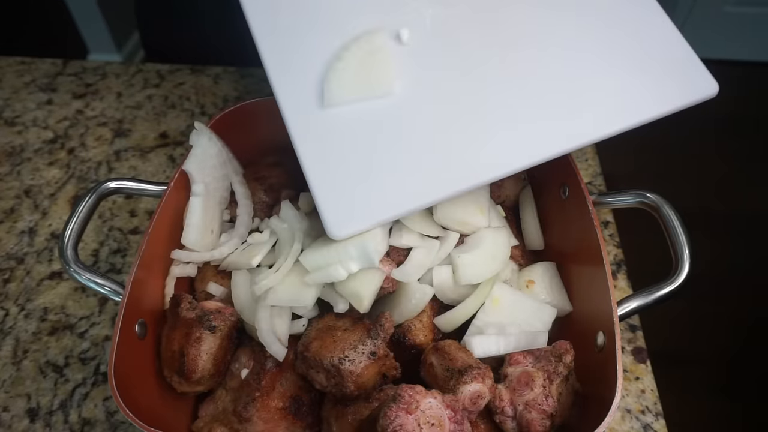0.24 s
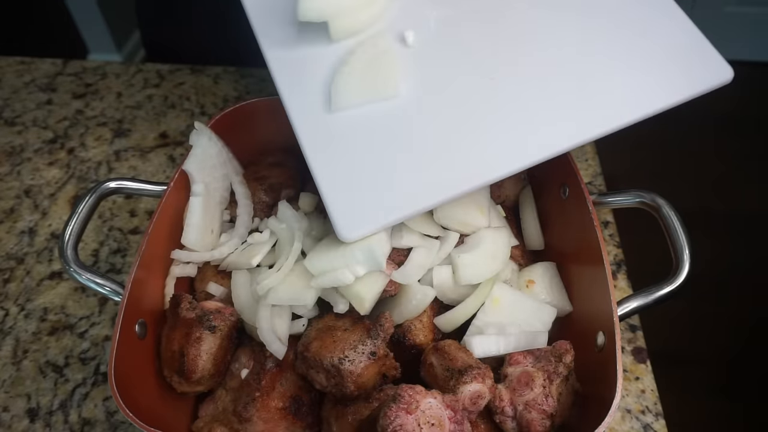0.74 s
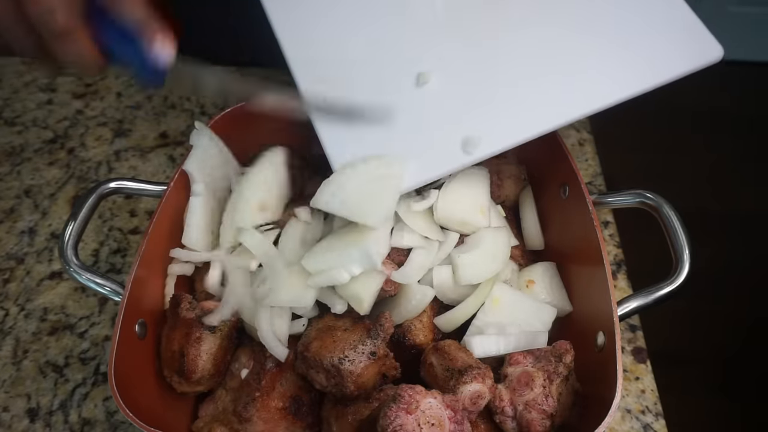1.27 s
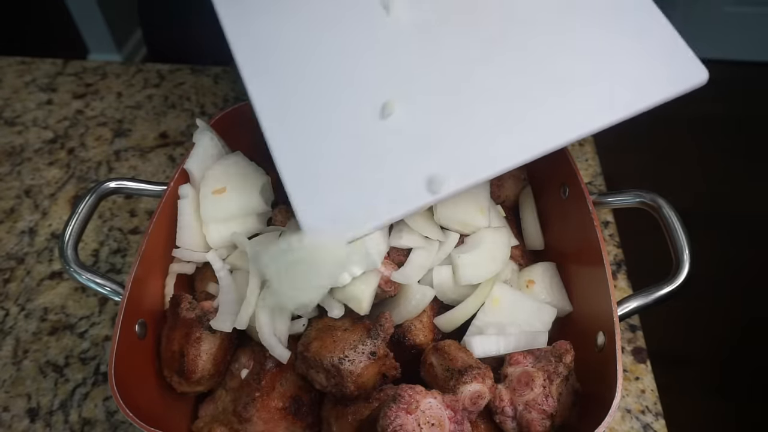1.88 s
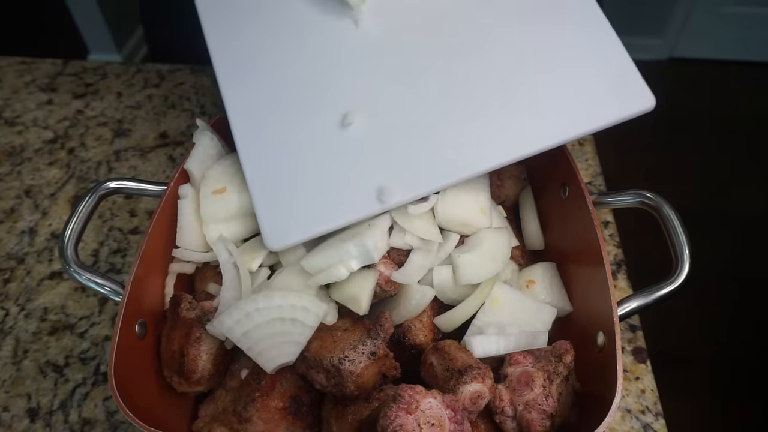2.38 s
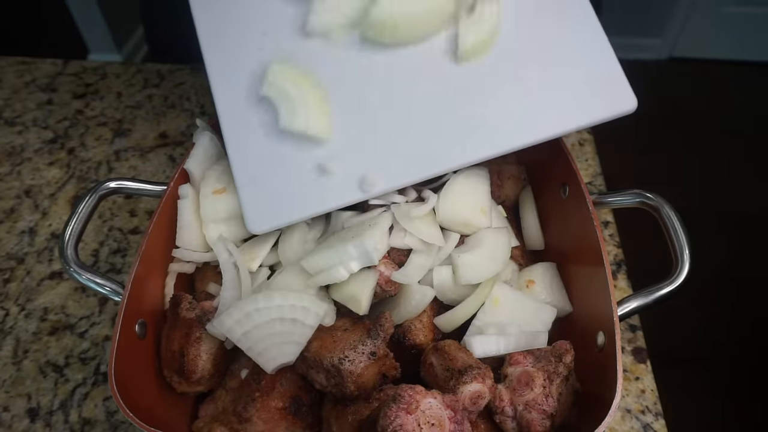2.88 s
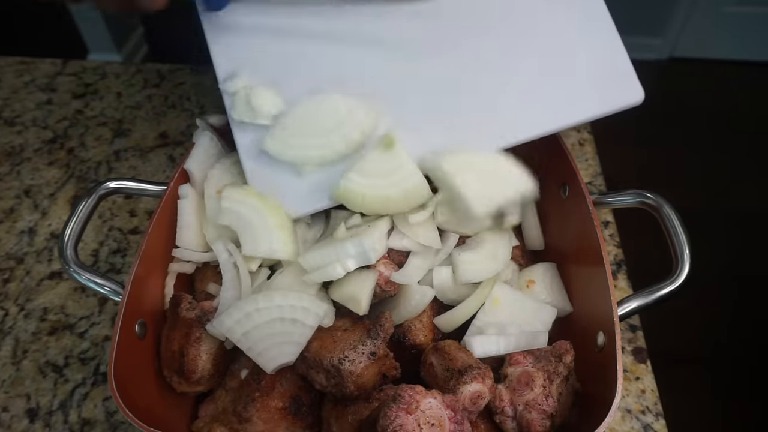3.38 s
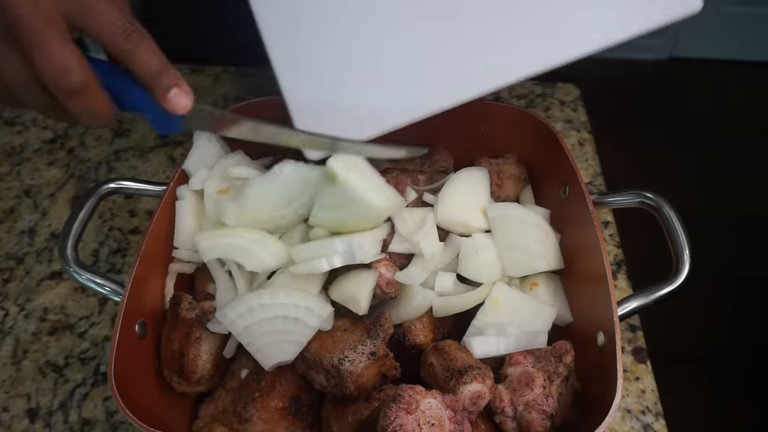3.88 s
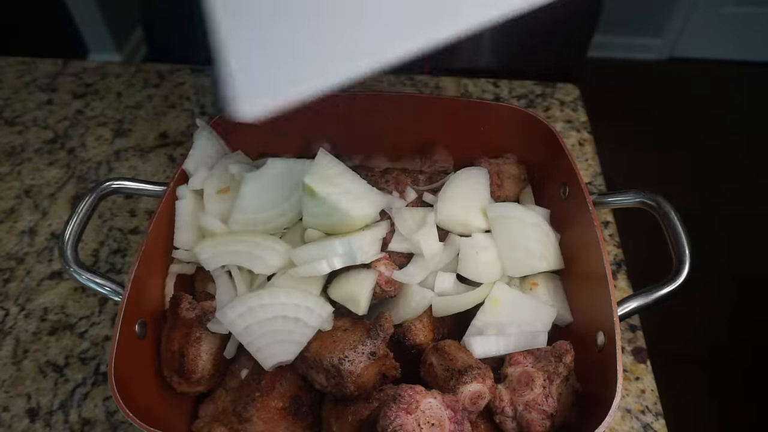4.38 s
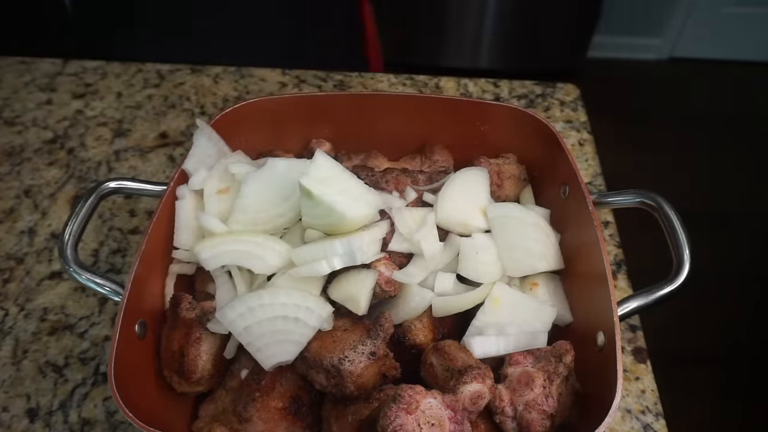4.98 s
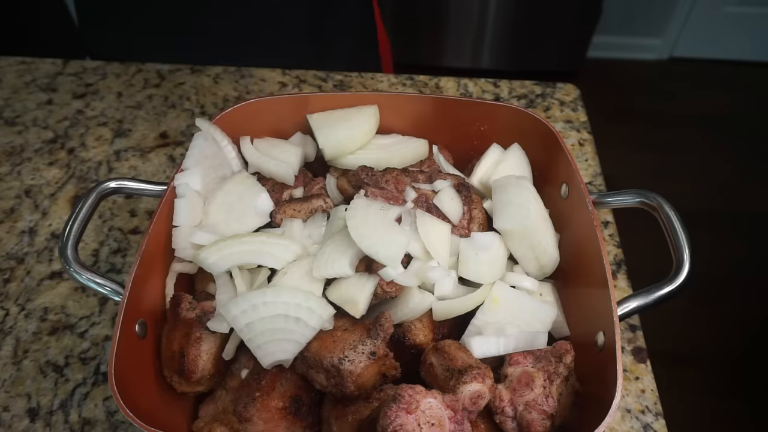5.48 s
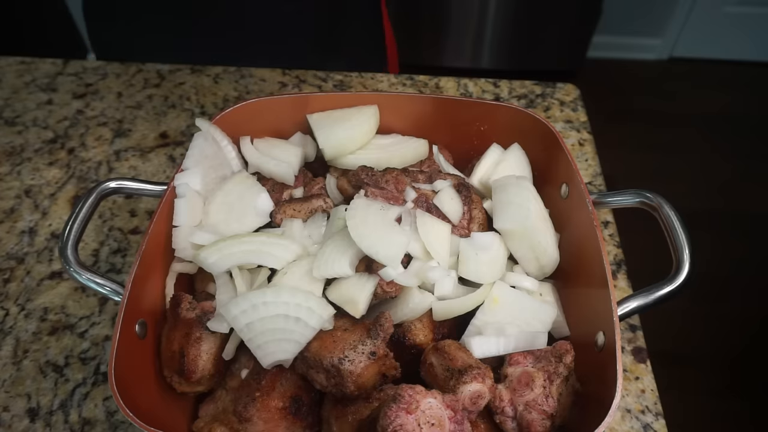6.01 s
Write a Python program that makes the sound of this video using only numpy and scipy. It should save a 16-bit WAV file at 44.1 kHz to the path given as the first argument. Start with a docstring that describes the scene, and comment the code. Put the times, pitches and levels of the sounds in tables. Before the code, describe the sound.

A small, hard-walled kitchen heard close in stereo, with soft low room noise and a faint appliance hum throughout. At about 0.35 s a dull plastic knock lands on the cutting board, another at 0.64. From 0.7 to 1.2 s the knife drags in a rough, stuttering scrape, strongest near 0.84, with grainy rumble and a hard slip at the end. A sharp tap comes at 1.74 and a softer one at 1.83, then faint wet ticks and light bumps. A very short scrape with a thin steely edge passes at 2.35. Light taps follow near 2.8; a firmer knock at 3.5 leads into brief gritty scuffs until 3.8. A moist rustle at 4.3 and a knock at 4.55 precede a lull. At 5.36 the pan thumps softly with a thin tink, then small hard clacks strike at 5.7, 5.8 and 5.95.

```python
"""A knife pushes chopped onion down a plastic board held over a pan in a small hard-walled kitchen.
It knocks, sticks, slips and scuffs: each contact is a burst of clicks that rings the board's modes.
A grainy rumble and a sliding hiss run along, the dragged blade sings, faint bright wet ticks rustle between.
Later the pan thumps softly and something small and hard clacks nearby, ringing modes of its own.
A two-port microphone hears the counter and the walls' diffuse answer; room noise and a hum lie under all."""
import sys
import numpy as np
from scipy import signal
from scipy.fft import rfft, irfft, next_fast_len
from scipy.io import wavfile

SR = 44100
rng = np.random.default_rng(int(sys.argv[2]) if len(sys.argv) > 2 else 0)


def generate_wav(sig):
    """Save sig (samples, or channels by samples) to the path in sys.argv[1] as 16-bit PCM at SR."""
    pcm = np.round(np.clip(np.atleast_2d(sig).T, -1, 1) * 32767).astype(np.int16)
    wavfile.write(sys.argv[1], SR, pcm)


N = 275625   # samples, 6.25 s

# Where a blow on the board has its levels set: f/Hz
BLOW_COLOUR_HZ = [400, 950, 2600, 8000]
# Modes of the plastic board: f/Hz, level/dB (relative), t60/s
BOARD_MODES = [(182, -4.5, 0.036), (264, -12, 0.058), (305, -16, 0.057), (415.7, 4, 0.033),
               (534, -0.5, 0.039), (584, 2, 0.032), (666, 6, .025), (766, 4, 0.028), (864, 4.5, 0.023),
               (958, -2, 0.042), (1143, 7, 0.014), (1283, 1.5, 0.021), (1460, 10, 0.007), (1735, 1, 0.015),
               (1910, 7.5, 0.0057), (2300, 6, 0.005), (2600, 5, 0.008), (2930, 7, 0.0043),
               (3363, -3.5, 0.013), (3776, 0, 0.008), (4250, 3, 0.0046), (4970, 1.5, 0.0041),
               (5720, -2, 0.0036), (6900, 4, 0.0021), (8730, -6, 0.0044), (9700, -3, 0.0017),
               (13600, -24, 0.0027)]


def board_blows(rows, **settings):
    """Contacts on the board, all ringing the same plate modes."""
    return blows(rows, BLOW_COLOUR_HZ, BOARD_MODES, **settings)


def on_board(s, peak_db, thud_db, crack_db, top_db, pan_db, contact):
    """One blow on the board: the thud sets the bass, the crack the bite and the top above it."""
    return (s, peak_db, thud_db, 0, crack_db, crack_db + top_db, pan_db, contact)


# Knocks at the counter, and the last hard slips that end two drags, before the layer's trim:
# t/s, peak level/dB, thud level/dB re peak, crack level/dB re peak
KNOCK_BLOWS = [(0.348, -19, -2, -7), (0.6383, -17.5, -7, -7), (1.0175, -26, -9, 5.5), (1.17, -21, -27, -6),
               (1.2069, -45, -1, 9), (1.7022, -42.5, 13, -9), (1.713, -48.5, 24.5, 5), (1.7208, -49, 10, 0),
               (1.7305, -43, 6, -6), (1.7379, -19, -16, -6.5), (1.8326, -27.5, -0.5, -17),
               (2.172, -38.5, 13, -14), (2.2007, -41, 13, -10), (2.2481, -47, 13, -5),
               (2.2866, -47, 19, -5), (2.4724, -41, 15.5, -34), (2.6014, -42, -0.5, 3),
               (2.6327, -40.5, 7, -11), (2.671, -45, 13, -14), (2.8315, -30, 12.5, -10),
               (2.8842, -38.5, 12.5, -3.5), (3.3724, -37, 3, -18), (3.5162, -20, 0, -14.5),
               (3.5535, -41, 2, -10), (3.6288, -32, 8, -19), (4.5512, -33, -15, 11),
               (4.5529, -20, 1.5, -4.5)]


def knocks():
    """Short hard contacts, knocks and drag-ending slips, each with a few weaker catches after the first click."""
    top_db, pan_db, contact_s = -8.5, -1.5, .0018   # top re crack; left-right
    rows = [on_board(*row, top_db, pan_db, contact_s) for row in KNOCK_BLOWS]
    return board_blows(rows, level_db=-4.0, scatter_db=3.0, after_db=-9.0, count=4)


# The blade sticks and lets go, one list a drag: t/s, slip rate/Hz
DRAG_SLIP_RATES = [
    [(.697, 200), (.737, 200)],
    [(.8113, 142), (.84, 113), (.87, 87), (.93, 65), (.98, 70), (1.0, 116), (1.012, 75)],
    [(1.0701, 130), (1.128, 106), (1.138, 55), (1.15, 190), (1.165, 135)],
    [(2.3429, 219), (2.362, 130), (2.378, 298)],
]
# How hard it grips, before the layer's trim:
# t/s, peak level/dB, thud level/dB re peak, crack level/dB re peak
GRIP_LEVELS = [(.697, -26, 4, -8), (.715, -25, -4, -12.5), (.737, -33, -8, -5.5), (.811, -23, -5.5, -6),
               (0.841, -11.5, -7.5, -6.5), (.858, -36, 10, -15), (.872, -18, -2.5, -5.5),
               (.93, -17, -4, -7.5), (.98, -19, -5, -8), (1.01, -23.5, -8, -10), (1.07, -30, -8, -7),
               (1.09, -20, -12, -12), (1.115, -26, 2, -0.5), (1.15, -30.5, -20, 4), (1.17, -20.5, -28, -7),
               (2.343, -26.5, 11, -13), (2.36, -27.5, 5, -11.5), (2.376, -36, 15, -4)]


def slip_rows():
    """A slip comes each time the rate has summed to one, a little uneven in time and strength."""
    top_db, pan_db, contact_s = -4, -1.5, 0.00167   # top re crack; left-right
    uneven_db, jitter_s = 1.5, .0003
    times = []
    for drag in DRAG_SLIP_RATES:
        s, per_s = np.transpose(drag)
        t = np.arange(s[0], s[-1], 1 / SR)
        slips_done = np.cumsum(np.interp(t, s, per_s)) / SR
        times += list(np.interp(np.arange(int(slips_done[-1]) + 1), slips_done, t))
    s, *columns = np.transpose(GRIP_LEVELS)
    peak_db, thud_db, crack_db = [np.interp(times, s, c) for c in columns]
    early, strong = rng.standard_normal((len(times), 2)).T
    uneven_times = times + jitter_s * early
    uneven_peaks_db = peak_db + uneven_db * strong
    return [on_board(*row, top_db, pan_db, contact_s)
            for row in zip(uneven_times, uneven_peaks_db, thud_db, crack_db)]


def slips():
    """Stick-slip: each release of the blade is a small blow on the board."""
    return board_blows(slip_rows(), level_db=-6.5, scatter_db=1.5, after_db=-18.0, count=3)


# Short gritty scuffs on the board, before the layer's trim:
# t/s, peak level/dB, thud level/dB re peak, crack level/dB re peak, length/s
SCUFF_RUNS = [(1.171, -22.5, -13, -6.5, .016), (2.31, -55, 27, 2, 0.02), (3.378, -34.5, -5.5, -25, .04),
              (3.562, -22.5, -20, -7, .044), (3.673, -32, 6, 0.5, .025), (3.721, -58.5, 33.5, 14, 0.016),
              (3.763, -37, 10, -2, 0.016)]


def scuffs():
    """Each scuff is a dense run of small catches, spread over its length."""
    top_db, pan_db = 3, -3.5   # top re crack; left-right
    rows = [on_board(*row, top_db, pan_db, length) for *row, length in SCUFF_RUNS]
    return board_blows(rows, level_db=-0.5, scatter_db=2.0, after_db=5.0, count=60)


# Faint bright wet ticks and rustles, before the layer's trim: t/s, peak level/dB, length/s
RUSTLE_RUNS = [(0.149, -42, 0.0029), (1.711, -37, .004), (1.907, -44, .021), (1.934, -43, 0.016),
               (1.972, -42, 0.016), (2.8214, -34.5, .003), (2.99, -32.5, 0.0041), (3.467, -43, 0.01),
               (3.8767, -38, .003), (4.31, -31.5, 0.067), (4.629, -35, .03)]


def rustles():
    """Wet ticks and rustles: runs of tiny catches that drive mostly the board's high modes."""
    colour_db, pan_db = [-29, -23, -12.5, 1.9], 2   # re peak at each of BLOW_COLOUR_HZ; left-right
    rows = [(s, peak_db, *colour_db, pan_db, length) for s, peak_db, length in RUSTLE_RUNS]
    return board_blows(rows, level_db=-0.5, scatter_db=2.0, after_db=5.0, count=60)


# Rubbing and the low rumble that trails after knocks, before trims:
# t/s, board rumble level/dB, sliding hiss level/dB
RUMBLE_HISS_LEVELS = [(0.0, -59, -87), (0.33, -42.5, -50), (0.37, -24, -76), (0.56, -41, -101),
                      (0.7, -45, -58), (0.85, -22, -65), (1.2, -27, -45), (1.28, -51, -59),
                      (1.76, -59, -96), (1.88, -39.5, -66.5), (2.04, -47, -56), (2.23, -49, -69),
                      (2.35, -24.5, -62), (2.45, -82, -83), (2.66, -41, -56.5), (2.92, -36, -49),
                      (3.19, -42.5, -52.5), (3.43, -45, -62.5), (3.66, -49, -47.5), (3.9, -52, -64.5),
                      (4.6, -46, -58), (5.29, -46, -59), (5.6, -46, -66), (6.0, -43.5, -55.5),
                      (6.25, -49.5, -64.5)]
# Spectrum of the sliding hiss: f/Hz, level/dB (density, relative)
HISS_SPECTRUM = [(710, 2), (1200, -6), (2300, -15), (2560, 8), (3430, -10.5), (4170, -8), (9410, -14),
                 (16000, -20.5)]


def rumble_and_hiss():
    """Uneven grains in the board modes make rubbing and the rumble after knocks; sliding hisses, fluttering."""
    grains_per_s = 900
    rumble_db, hiss_db = in_time(RUMBLE_HISS_LEVELS)
    sizes = from_db(3.5 * np.minimum(rng.exponential(1, N), 4)) * rng.choice([-1, 1], N)
    grains = sizes * (rng.random(N) < grains_per_s / SR)
    hz = np.array(BOARD_MODES)[:, 0]
    softness = from_db(-4.0 * np.log2(1 + hz / 900))   # the high modes are driven less
    body = signal.fftconvolve(softness @ mode_rings(BOARD_MODES), grains)[:N]
    hiss = banded_noise(HISS_SPECTRUM, patchy_db=1.5) * from_db(1.2 * drift(46))
    return from_db(rumble_db - 11.5) * rms_one(body), from_db(hiss_db + 0.5) * hiss


# The blade sings as it drags: t/s, level/dB
SING_LEVELS = [(2.17, -69), (2.25, -76.5), (2.368, -54.5), (2.38, -87)]
# Modes of the steel: f/Hz, damping/Hz (t60 = 1 / damping), level/dB (relative)
BLADE_MODES = [(3490, 86, -5), (6340, 340, 1), (7770, 150, 3.5), (9540, 200, -4), (11200, 200, -11)]


def blade():
    """Rough drag noise in the narrow modes of the steel."""
    start = (SING_LEVELS[0][0] - .01, -120)
    end = (SING_LEVELS[-1][0] + .01, -120)
    level_db, = in_time([start] + list(SING_LEVELS) + [end])
    drag = rng.standard_normal(N) * from_db(4.6 * drift(94))
    return sum(from_db(level_db + db) * rms_one(ring(drag, hz, 1.0 / damping))
               for hz, damping, db in BLADE_MODES)


# Small hard clacks nearby, before the layer's trim:
# t/s, peak level/dB, body level/dB re peak, ring level/dB re peak
CLACK_HITS = [(5.685, -22, -10.5, -9.5), (5.792, -15, -17, -12.5), (5.936, -16.5, -12, -5)]
# Where a clack has its levels set (body, ring, peak, two tops): f/Hz
CLACK_COLOUR_HZ = [1200, 2200, 3600, 4700, 9000]
# Modes of the clacking thing: f/Hz, level/dB (relative), t60/s
CLACKER_MODES = [(780, -6, .012), (1130, 0, .014), (1350, 0, .014), (1700, 0, .008), (1980, -1, .008),
                 (2250, 0, .009), (2650, 0, .006), (3000, -1, .005), (3400, -1, .005), (3800, -1, .005),
                 (4250, -1, .005), (4560, -1, .006), (5200, -2, .004), (5900, -1, .003), (6900, -1, .003),
                 (8200, -1, .002), (9800, -1, .002), (11800, -1, .002), (14200, -3, .002)]
# One thin tink, before the layer's trim: peak level/dB, then level/dB re peak at each of CLACK_COLOUR_HZ
TINK_LEVELS = (-24, -30, -21.5, -27, -2.5, -37)


def clacks():
    """One thin tink, then clacks: a small hard body rings many short modes."""
    tops_db, pan_db, contact_s = [-8.5, -19.5], -2, 0.004   # tops re peak; left-right
    tink_s = 5.36
    hits = [(tink_s, *TINK_LEVELS)] + [(*hit, 0, *tops_db) for hit in CLACK_HITS]
    rows = [(*hit, pan_db, contact_s) for hit in hits]
    # seen edge-on: neighbouring modes oppose
    return blows(rows, CLACK_COLOUR_HZ, CLACKER_MODES, level_db=8.5, scatter_db=2.3,
                 after_db=-10, count=16, facing=-1.019)


# A soft low thump as the pan is nudged: t/s, f/Hz, level/dB, t60/s
PAN_THUMP = (5.36, 203, -41.5, 0.34)


def thump():
    """One low mode, pushed gently."""
    s, hz, db, t60 = PAN_THUMP
    push = np.zeros(N)
    push[round(s * SR):round(s * SR) + 100] = np.hanning(100) / 50
    return from_db(db) * ring(push, hz, t60)


# How long the small hard-walled kitchen answers: f/Hz, t60/s
KITCHEN_DECAY = [(150, 0.37), (500, 0.39), (2000, 0.48), (6000, 0.27), (15000, 0.41)]


def kitchen(x):
    """A dense diffuse answer: bands of noise build up briefly, then each dies at its own rate."""
    t, tail = np.arange(SR) / SR, 0
    edges = 100 * 2 ** np.arange(0, 7.6, .5)
    for low, high in zip(edges, edges[1:]):
        hz = np.sqrt(low * high)
        mid, side = half_octave(low, high, rng.standard_normal((2, SR)))
        apart = hz ** 3 / (hz ** 3 + 1100 ** 3)   # long waves reach both ports alike
        fade = from_db(-60 * t / at_hz(KITCHEN_DECAY, hz))
        tail = tail + (mid + apart * side * [[1], [-1]]) * fade
    tail = tail * (1 - np.exp(-t / 0.00043))
    return signal.fftconvolve(tail, x[None])[:, :N]


# Left-right level of the microphone pair for sounds at the counter: f/Hz, level/dB
PORT_TILT = [(60, 0.0), (130, -6), (290, 0), (640, 0.5), (1410, -3.5), (3100, -4), (6820, -1.5),
             (15000, -1.5)]
# How far the left port leads: f/Hz, phase/rad
PORT_LEAD = [(300, 0), (1720, 0.16), (2150, 0.94), (2700, 0.6), (6000, 0.79), (11300, 1.26), (14400, 1.2),
             (16000, -1)]


def ports(x):
    """The two microphone ports hear the counter with their own level and phase."""
    size = next_fast_len(N + 4096)
    hz = np.maximum(np.fft.rfftfreq(size, 1 / SR), 1)
    turn = np.exp(1j * np.multiply.outer([.5, -.5], at_hz(PORT_LEAD, hz)))
    return irfft(rfft(x, size) * sides(at_hz(PORT_TILT, hz)) * turn, size)[:, :N]


# Spectrum of the room noise: f/Hz, level/dB (density, relative)
ROOM_SPECTRUM = [(15, -43), (25, -11), (117, 3), (277, -0.5), (394, -0.5), (545, -5.5), (659, -20),
                 (818, -11), (887, -13), (1040, -13), (11600, -35), (14400, -32), (16000, -46)]
# Course of the room noise, before its trim: t/s, level/dB
ROOM_COURSE = [(0.0, -55.5), (1.5, -56), (4.4, -53.5), (5.0, -54), (6.25, -53)]
# Appliance hum, before the swell: f/Hz, damping/Hz (t60 = 4.8 / damping), level/dB
APPLIANCE_HUM = [(119.5, 8.2, -66), (885, 2.5, -64)]


def background():
    """Room noise and the narrow hums of an appliance swell together."""
    level_db, = in_time(ROOM_COURSE)
    hums = sum(from_db(db) * rms_one(ring(rng.standard_normal(N), hz, 4.8 / damping))
               for hz, damping, db in APPLIANCE_HUM)
    swell = from_db(level_db - np.mean(level_db))
    return from_db(level_db + 1.5) * banded_noise(ROOM_SPECTRUM, patchy_db=2.0) + swell * hums


# Likeness of left and right in hiss and room noise: f/Hz, correlation
NOISE_LIKENESS = [(60, 1), (180, 0.99), (550, 0.68), (1650, 0.067), (4970, 0.29), (15000, 0.35)]


def banded_noise(spectrum, patchy_db):
    """Half-octave bands of stereo noise, each with its own level, flicker and likeness; rms 1."""
    out = 0
    edges = 22 * 2 ** np.arange(0, 9.9, .5)
    white = rng.standard_normal((2, 2, N))   # neighbouring bands take different noise
    for k, (low, high) in enumerate(zip(edges, edges[1:])):
        hz = np.sqrt(low * high)
        if hz < spectrum[0][0]:
            continue
        mid, side = half_octave(low, high, white[k % 2])
        alike = np.clip(at_hz(NOISE_LIKENESS, hz), -1, .993)
        gain = from_db(at_hz(spectrum, hz) + patchy_db * drift(8.5))
        out = out + gain * (np.sqrt(1 + alike) * mid + np.sqrt(1 - alike) * side * [[1], [-1]])
    return rms_one(out)


def half_octave(low, high, x):
    """Keep one band of the noise."""
    return signal.sosfilt(signal.butter(2, [low, high], "band", fs=SR, output="sos"), x)


def blows(rows, colour_hz, modes, level_db, scatter_db, after_db, count, facing=1):
    """Each blow strikes all modes by its colour and catches again during contact; left, right, walls."""
    hz, out = np.array(modes)[:, 0], np.zeros((3, N + SR))
    sideways = hz / (hz + 1500)   # long waves reach both ports alike
    order = np.arange(len(modes))[:, None]
    averaged = (-1.) ** order * mode_rings(modes)   # the walls hear all modes evenly, from every side
    luck = rng.standard_normal((len(rows), 3, len(modes)))
    catches = rng.random((len(rows), 2, count))
    for row, (body, ear, grip), (when, size) in zip(rows, luck, catches):
        s, peak_db, *colour, pan_db, contact = row
        strength = from_db(peak_db + level_db + at_hz(list(zip(colour_hz, colour)), hz))
        # grip and load shift the higher modes
        rings = facing ** order * mode_rings(modes, 1 + .05 * sideways * grip)
        ears = from_db(scatter_db * body) * sides(sideways * (pan_db + 2 * scatter_db * ear))
        rung = np.vstack([(strength * ears) @ rings, strength @ averaged])
        clicks = np.zeros(int(max(contact, 1e-3) * SR) + 1)
        push = from_db(after_db) * np.sin(np.pi * when) * (2 * size - 1)   # the pressure swells and fades
        np.add.at(clicks, (when * len(clicks)).astype(int), push)
        clicks[0] = -1
        sound = signal.fftconvolve(rung, clicks[None] / np.linalg.norm(clicks))
        start = round(s * SR)
        out[:, start:start + sound.shape[1]] += sound
    return out[:, :N]


def mode_rings(modes, detune=1):
    """Each mode's answer to a unit click, as rows; it takes a fraction of a cycle to swing up."""
    hz, db, t60 = np.transpose(modes)[:, :, None]
    t = np.arange(SR // 16) / SR * np.reshape(detune, (-1, 1))
    ringing = from_db(db - 60 * t / t60) * np.sin(2 * np.pi * hz * t)
    return ringing * (1 - np.exp(-(3.8 * hz * t) ** 2))


def ring(clicks, hz, t60):
    """A two-pole resonator: a unit click sets a sine of height 1 ringing."""
    r, w = np.exp(-np.log(1000) / (t60 * SR)), 2 * np.pi * hz / SR
    return signal.lfilter([0, np.sin(w)], [1, -2 * r * np.cos(w), r * r], clicks + 1e-18)


def drift(rate):
    """Slow chance of spread 1: noise smoothed by two poles at rate (Hz), one point per 40 samples."""
    r = np.exp(-80 * np.pi * rate / SR)
    steps = rng.standard_normal(N // 40 + 2002)
    slow = signal.lfilter([1], [1, -2 * r, r * r], steps)[2000:]   # drop the run-in
    return np.interp(np.arange(N) / 40, np.arange(len(slow)), rms_one(slow))


def sides(pan_db):
    """Left and right gains for a left-right difference."""
    return from_db(np.multiply.outer([.5, -.5], pan_db))


def in_time(rows):
    """Columns of a curve table, sample by sample."""
    s, *columns = np.transpose(rows)
    return [np.interp(np.arange(N) / SR, s, c) for c in columns]


def at_hz(points, hz):
    """Read a spectrum on a log-frequency axis."""
    point_hz, values = np.array(points)[:, 0], np.array(points)[:, 1]
    return np.interp(np.log(hz), np.log(point_hz), values)


def from_db(db):
    """dB to gain."""
    return 10 ** (np.asarray(db) / 20)


def rms_one(x):
    """Scale to unit rms."""
    return x / np.sqrt(np.mean(x ** 2) + 1e-20)


def scene():
    """Board sounds and clacks with the kitchen's answer, over the background."""
    rumble, hiss = rumble_and_hiss()
    more_to_walls = [[1], [1], [from_db(2.5)]]   # the knock layer reaches the walls more
    board = knocks() * more_to_walls + slips() + scuffs() + rustles() + rumble + blade()
    # small things radiate no bass, and the clacking thing is smaller still
    board = signal.sosfilt(signal.butter(4, 210, "high", fs=SR, output="sos"), board)
    clacking = signal.sosfilt(signal.butter(2, 650, "high", fs=SR, output="sos"), clacks())
    answer = kitchen(from_db(-38) * board[2] + from_db(-36) * clacking[2])
    counter = ports(board[:2] + clacking[:2] + answer + hiss)
    return counter + thump() + background()


def record(dry):
    """The top is cut steeply, 70 dB down from 16.3 kHz."""
    return signal.sosfilt(signal.cheby2(14, 70, 16300, fs=SR, output="sos"), dry)


dry = scene()
out = record(dry)
generate_wav(out)
```